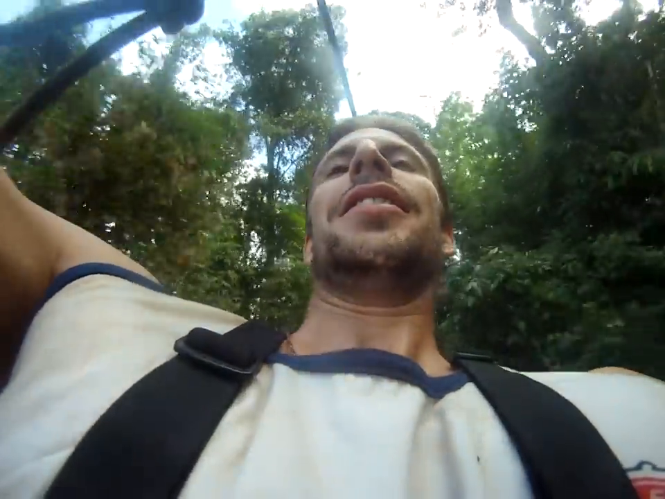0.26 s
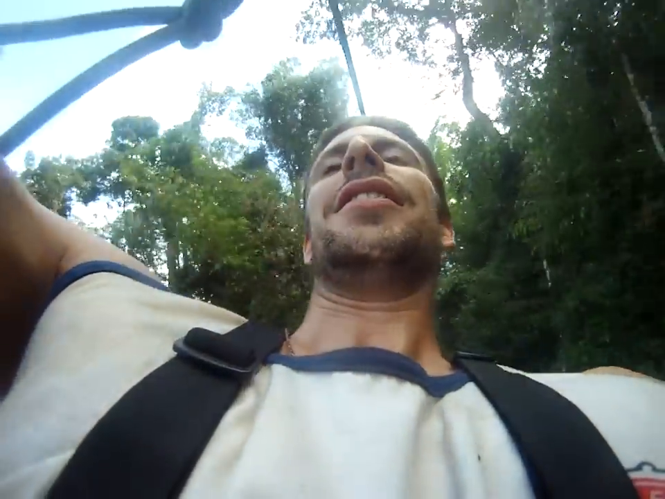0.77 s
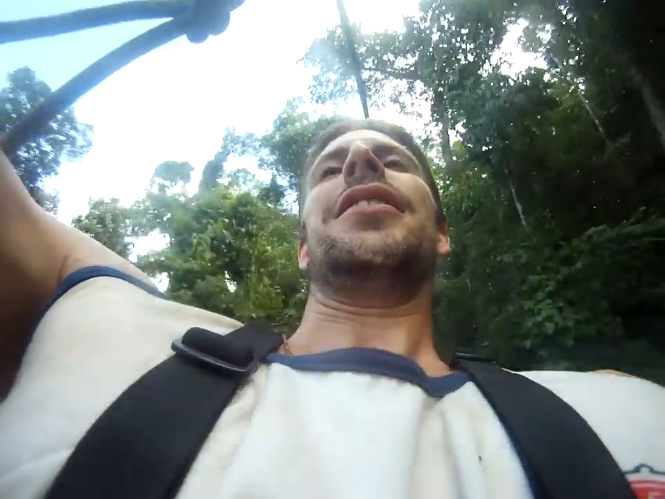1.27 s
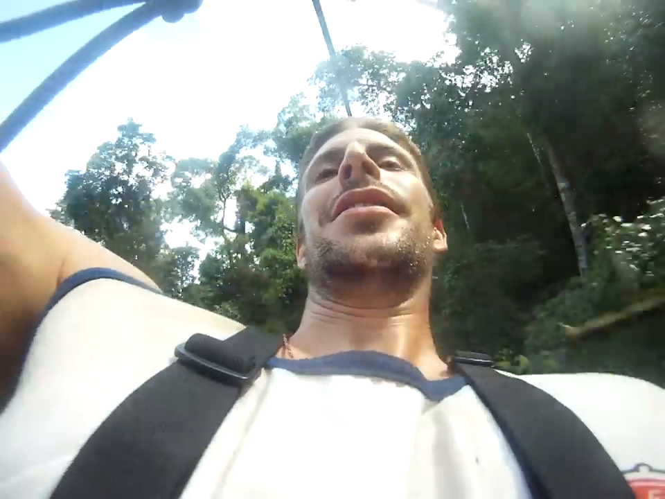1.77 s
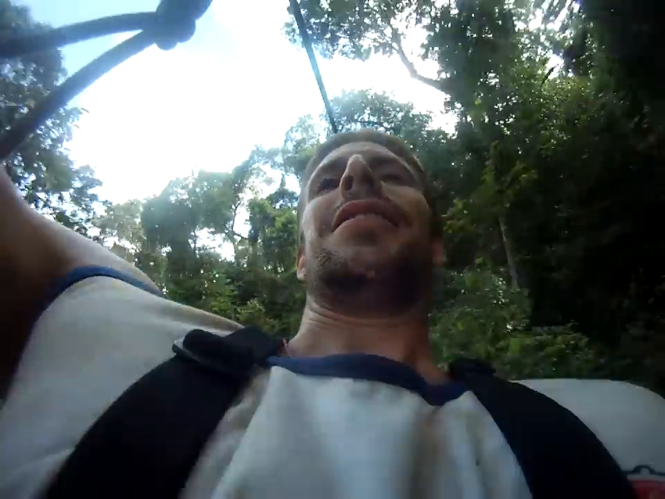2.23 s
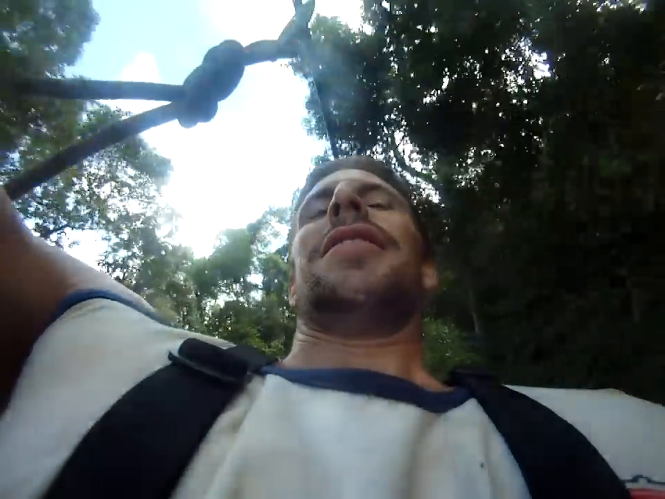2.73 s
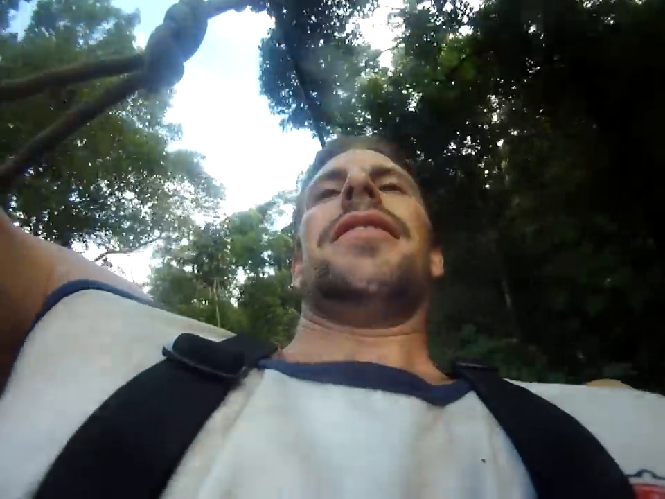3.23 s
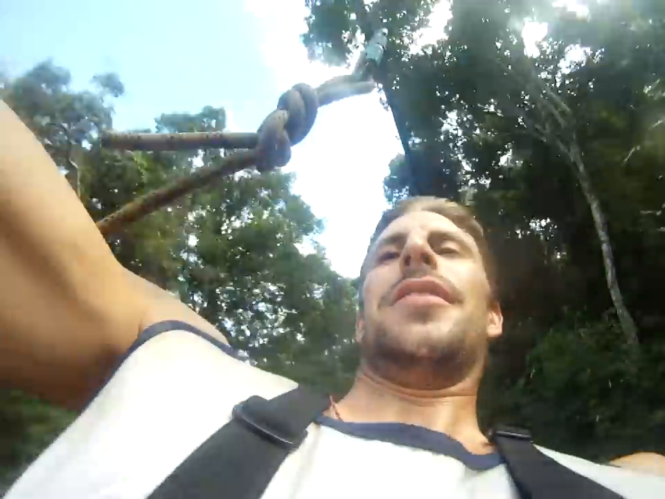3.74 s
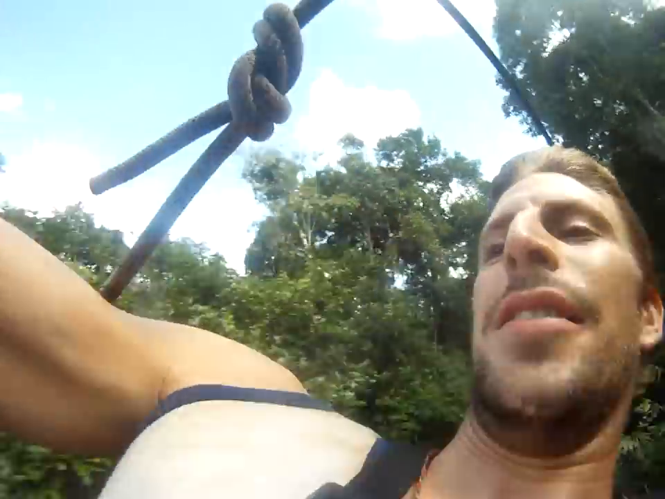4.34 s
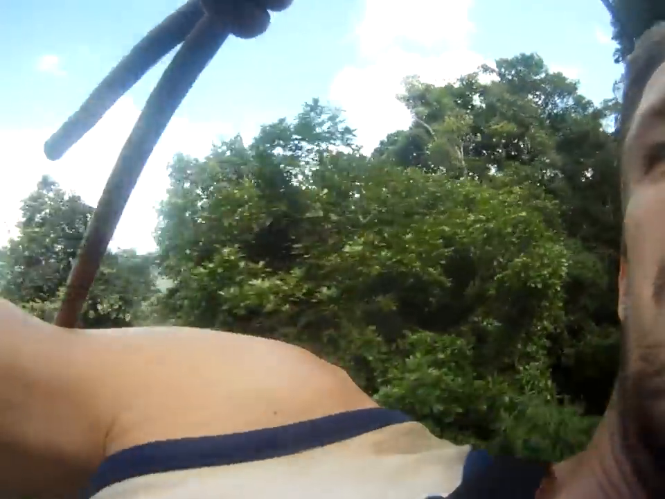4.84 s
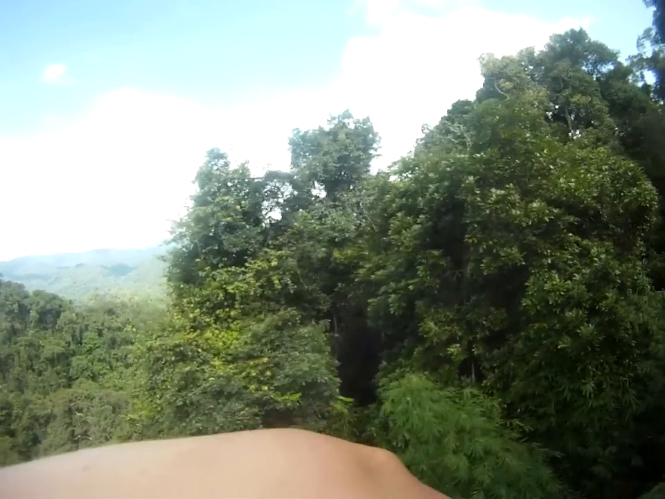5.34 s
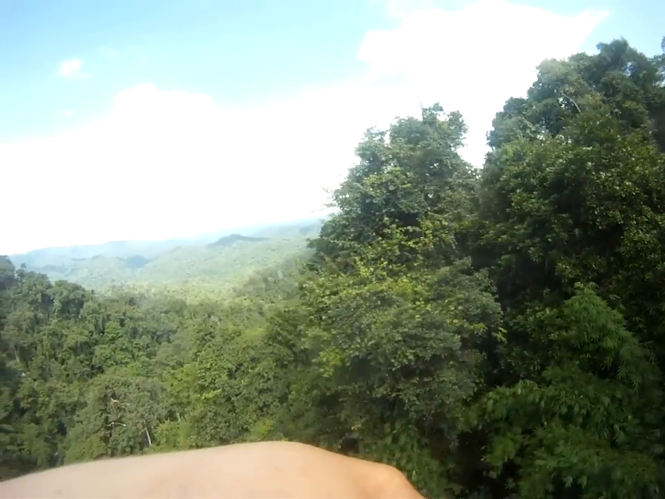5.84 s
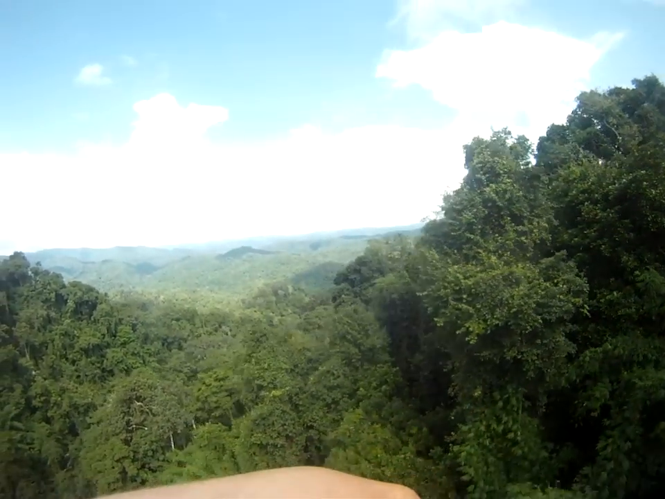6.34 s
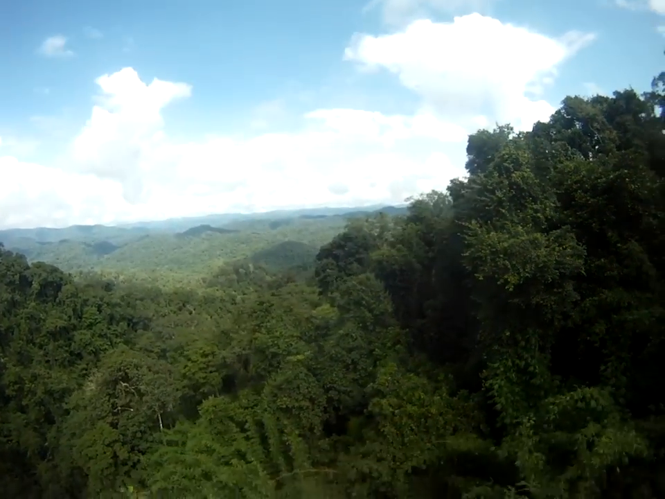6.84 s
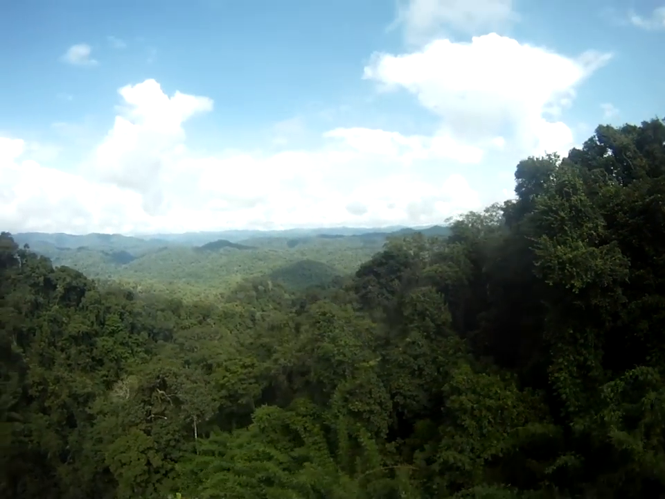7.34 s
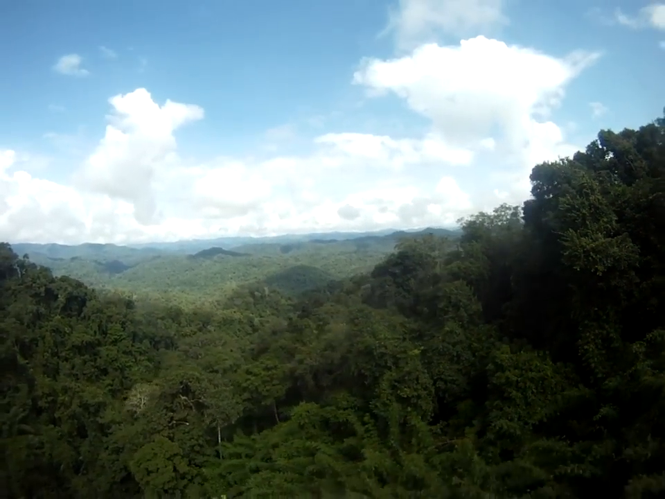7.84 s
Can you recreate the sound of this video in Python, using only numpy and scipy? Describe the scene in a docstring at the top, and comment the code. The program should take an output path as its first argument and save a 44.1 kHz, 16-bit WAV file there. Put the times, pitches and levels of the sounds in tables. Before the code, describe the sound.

A pulley trolley runs along a steel cable in open forest, heard from a small handheld camera. Its rough metallic roar and wavering whine climb in pitch, with thin squeals flaring in the first five seconds. Four hard, distorted knocks hit the camera shell mid-ride, briefly ducking everything. Then the pitch levels off and wind buffets and pops against the microphone while the rolling continues.

```python
"""Zipline ride

A zipline trolley gathers speed down a steel cable, heard from a small camera held by the rider.
Tones tied to one speed curve make whine, whirr and squeals; coloured noise makes rolling and wind.
Filtered bursts slap the microphone; four knocks of damped sines overload it and the gain ducks.
Coarse 12 kHz sampling with held samples mirrors the sound into the treble."""
import sys
import numpy as np
from scipy import signal
from scipy.fft import rfft, irfft, next_fast_len
from scipy.io import wavfile
from scipy.ndimage import uniform_filter1d

SR = 44100
rng = np.random.default_rng(int(sys.argv[2]) if len(sys.argv) > 2 else 0)


def dump_mix(stems):
    """Bounce the given channels to the path in sys.argv[1] as a 16-bit WAV at rate SR."""
    frames = np.atleast_2d(stems).T  # one column per channel
    limited = np.clip(frames, -1, 1)  # hard clip at full scale
    pcm = np.round(limited * 32767).astype(np.int16)
    wavfile.write(sys.argv[1], SR, pcm)


N = 357210
T = np.arange(N) / SR

# camera swing: time_s, facing (0 front, 1 side, 2 away)
CAMERA_SWING = [(0, 0), (2, 0.067), (3.2, 0.13), (3.9, 1.2), (5.1, 1.16), (5.7, 1.84), (6.4, 1.92),
                (8.1, 1.87)]
START_HZ, TOP_HZ, TOP_SPEED_S = 1386, 1813, 6.0  # strands crossed per second; time of top speed
STRANDS_PER_TURN = 11.86
WOBBLE_TOP_HZ = 22  # partials' pitch spread at top speed


def from_db(db):
    """Decibels to amplitude gain."""
    return 10 ** (np.asarray(db) / 20)


def rms_one(x):
    """Scale to rms 1."""
    return x / np.sqrt(np.mean(x ** 2) + 1e-20)


def in_time(rows):
    """Interpolate each column of a time curve at every sample."""
    time_s, *columns = np.transpose(rows)
    return [np.interp(T, time_s, column) for column in columns]


def drift(corner_hz):
    """Slow random curve, rms 1: two-pole smoothed noise made at SR / 20."""
    r = np.exp(-40 * np.pi * corner_hz / SR)
    noise = rng.standard_normal(N // 20 + 4002)
    slow = signal.lfilter([1], [1, -2 * r, r * r], noise)[4000:]  # drop the settling
    return np.interp(np.arange(N) / 20, np.arange(len(slow)), rms_one(slow))


def band(x, hz, kind, order=4):
    """Butterworth filter."""
    return signal.sosfilt(signal.butter(order, hz, kind, fs=SR, output="sos"), x)


def coloured(spectrum):
    """Noise shaped to a spectrum on a log-frequency axis, rms 1."""
    hz, density_db = np.transpose(spectrum)
    size = next_fast_len(N)
    bins_hz = np.maximum(np.fft.rfftfreq(size, 1 / SR), 1)
    gain = from_db(np.interp(np.log(bins_hz), np.log(hz), density_db))
    return rms_one(irfft(rfft(rng.standard_normal(size)) * gain, size)[:N])


def resonate(x, modes):
    """Parallel two-pole resonances of alternating sign."""
    out = 0
    for k, (hz, width_hz, gain_db) in enumerate(modes):
        r = np.exp(-np.pi * width_hz / SR)
        zeros = np.array([1, 0, -1]) * (1 - r * r) / 2
        poles = [1, -2 * r * np.cos(2 * np.pi * hz / SR), r * r]
        out = out + (-1) ** k * from_db(gain_db) * signal.lfilter(zeros, poles, x + 1e-18)
    return out


def burst(start_s, hold_s, fade_s):
    """Envelope: instant onset, hold, exponential decay."""
    return (T >= start_s) * np.exp(-np.clip((T - start_s - hold_s) / fade_s, 0, 20))


def sine(hz):
    """Sine following a pitch curve from a random phase."""
    return np.sin(2 * np.pi * (np.cumsum(hz) / SR + rng.random()))


def partial(hz, wobble_hz, flutter_db):
    """Tone with random pitch wobble and level flutter, rms 1."""
    return rms_one(from_db(flutter_db * drift(28)) * sine(hz + wobble_hz * drift(70)))


def speed():
    """Strands per second: the pull fades evenly to zero at top speed, with one brief check."""
    # check on the way: slowest_s, lost_hz, half_length_s
    sag = (4.45, 13, .4)
    slowest_s, lost_hz, half_s = sag
    remaining = np.maximum(1 - T / TOP_SPEED_S, 0)
    check_hz = lost_hz * np.exp(-((T - slowest_s) / half_s) ** 2)
    return TOP_HZ - (TOP_HZ - START_HZ) * remaining ** 2 - check_hz


def by_facing():
    """Frame ring pitch and top-speed rolling level, interpolated by the camera swing."""
    # pickup facing front, side, away: frame_ring_hz, rolling_db (at top speed, before trim)
    pickup = [(3060, -26), (2936, -29), (2794, -28.5)]
    swing, = in_time(CAMERA_SWING)
    return [np.interp(swing, np.arange(len(pickup)), column) for column in np.transpose(pickup)]


def roll_level():
    """Rolling level in dB before trims: rises 12.5 dB per doubling of speed."""
    _, top_speed_db = by_facing()
    return top_speed_db + 12.5 * np.log2(speed() / TOP_HZ)


def trolley(whine_trim_db=3, whirr_trim_db=-1, judder_db=0.68):
    """Whine, whirr, squeals, rolling and hum, shaken together by the cable."""
    # strand whine: time_s, level_db (before trim)
    whine_curve = [(0, -35), (.2, -28), (.9, -25.5), (1.1, -35), (1.38, -34), (1.6, -23.5), (2.25, -37.5),
                   (2.65, -34.5), (3.45, -28), (4, -46), (4.9, -39), (5.42, -29.5), (5.62, -22.5),
                   (5.8, -31.5), (7.25, -33), (7.72, -27), (7.85, -39), (8.1, -34.5)]
    # frame whirr: time_s, level_db (before trim)
    whirr_curve = [(0, -18.5), (.5, -21.5), (.68, -15), (.95, -25), (1.48, -22), (1.62, -17.5), (1.85, -25),
                   (2.17, -17), (2.7, -25), (3.3, -22.5), (3.9, -31), (5, -21.5), (5.3, -29), (5.9, -60),
                   (6.4, -23), (7.15, -21), (7.6, -19), (8.1, -23.5)]
    whine_db, = in_time(whine_curve)
    whirr_db, = in_time(whirr_curve)
    strand_hz = speed() + 3 * drift(3)
    turn_hz = strand_hz / STRANDS_PER_TURN
    ring_hz, _ = by_facing()
    wobble_hz = WOBBLE_TOP_HZ * (strand_hz / TOP_HZ) ** 3
    ring = wheel_ring(turn_hz, ring_hz, width_hz=280, wobble_hz=wobble_hz, flutter_db=4)
    whirr = from_db(whirr_db + whirr_trim_db) * ring
    tones = whine(strand_hz, whine_db + whine_trim_db) + whirr + squeals(turn_hz)
    return (tones + rolling() + frame_hum()) * from_db(judder_db * drift(9.1))


def whine(strand_hz, level_db, wobble_hz=5, flutter_db=1.1):
    """Twisted strands tap the wheel: one sine at the strand rate."""
    return from_db(level_db + flutter_db * drift(17)) * sine(strand_hz + wobble_hz * drift(33))


def wheel_ring(turn_hz, centre_hz, width_hz, wobble_hz, flutter_db):
    """Multiples of the turning rate swell as they glide through the frame's ring; rms 1."""
    out, power = 0, 0
    for multiple in range(17, 28):
        hz = multiple * turn_hz
        weight = 1 / (1 + (2 * (hz - centre_hz) / width_hz) ** 2)
        out = out + weight * partial(hz, wobble_hz, flutter_db)
        power = power + weight ** 2
    return rms_one(out / np.sqrt(power))


def squeals(turn_hz, patchy_db=2.5, attack_s=0.02, release_s=0.046):
    """Wheel partials sing faintly and unevenly, and flare into purer tones when the wheel squeals."""
    # constant partials: multiple of turning rate, level_db
    partials = [(22, -39), (24, -35), (25, -34), (26, -42), (27, -31.5), (28, -38)]
    # squeals: start_s, hold_s, multiple of turning rate, peak_db
    squeal_events = [(0, 0.045, 26, -19), (0.193, 0.27, 26, -25), (0.336, 0.093, 25, -19),
                     (0.577, .18, 25, -20.5), (0.916, 0.19, 27, -26), (1.55, 0.17, 24, -21),
                     (1.943, 0.27, 22, -20), (1.975, 0.36, 26, -36), (1.965, 0.82, 25, -24),
                     (2.37, 0.43, 27, -22.5), (2.398, 0.1, 28, -24), (2.403, 0.14, 26, -22),
                     (2.916, 1.1, 28, -27), (2.923, 1.15, 26, -23.5), (3.2, 0.13, 25, -21.5),
                     (3.257, 0.76, 27, -20), (3.72, 0.25, 25, -17), (4.008, 0.24, 25, -16),
                     (4.297, 0.35, 25, -18.5), (4.842, 0.24, 25, -22.5), (4.904, 0.4, 24, -25),
                     (6.714, 0.1, 24, -24)]
    out = 0
    for multiple, faint_db in partials:
        hz, flare = multiple * turn_hz, np.zeros(N)
        for start_s, hold_s, squeal_multiple, peak_db in squeal_events:
            if squeal_multiple == multiple:
                attack = np.clip((T - start_s) / attack_s, 0, 1)
                shape = attack * burst(start_s, hold_s, release_s)
                flare = np.maximum(flare, from_db(peak_db) * shape)
        faint = partial(hz, wobble_hz=WOBBLE_TOP_HZ, flutter_db=4)
        pure = partial(hz, wobble_hz=12, flutter_db=3.2)
        out = out + from_db(faint_db + patchy_db * drift(6.7)) * faint + flare * pure
    return out


def rolling(roll_trim_db=1.5, ring_dip_db=-5, rough_db=1.0):
    """Steel on steel: rough roar with a rasp on top, coloured by the way the camera faces."""
    # rolling colours by facing: pitch_hz, density_db (per Hz, relative)
    roll_front = [(700, -74), (1100, -25), (1300, -25), (1480, -13.5), (1720, -19), (1880, -11.5),
                  (2020, -23.5), (2280, -5.5), (2700, -19), (3100, 2), (3500, -11.5), (3720, -17.5),
                  (3920, -8), (4300, -18), (5650, -1.5)]
    roll_side = [(700, -26), (1100, -21), (1300, -22), (1480, -12), (1680, -17), (1950, -11), (2200, -6),
                 (2480, -10), (2800, -2), (3250, -16.5), (3550, -2), (3950, -1.5), (4600, -17.5),
                 (5200, -1.5), (5650, -7.5)]
    roll_away = [(700, -28), (1100, -23.5), (1350, -19.5), (1600, -23.5), (1900, -9.5), (2150, -15),
                 (2500, -9), (2820, 1), (3100, -2), (3550, -12.5), (3900, -36), (4250, -8), (4950, -15),
                 (5400, -9.5), (5650, -11)]
    # wheel rasp: time_s, level_db
    rasp_curve = [(0, -26.5), (1.05, -25), (2, -29.5), (2.25, -20.5), (2.5, -25), (2.9, -22.5),
                  (3.5, -25.5), (3.85, -20), (4.45, -17.5), (5.2, -19.5), (5.42, -29), (6.1, -28),
                  (6.8, -21), (6.95, -26), (7.35, -27), (7.62, -20.5), (7.88, -25), (8.1, -24)]
    roll_db = roll_level() + roll_trim_db
    rasp_db, = in_time(rasp_curve)
    swing, = in_time(CAMERA_SWING)
    out = 0
    for k, spectrum in enumerate([roll_front, roll_side, roll_away]):
        noise = band(coloured(spectrum), 840, "high")
        reference = np.std(band(noise, [1950, 2700], "band"))
        body = band(noise, 4336, "low", order=8) / reference
        rasp = rms_one(band(coloured(spectrum), [4400, 5900], "band", order=5))
        # around 3 kHz the energy goes into the wheel's partials instead
        body = body - (1 - from_db(ring_dip_db)) * resonate(body, [(3093, 470, 0)])
        facing = np.sqrt(np.clip(1 - abs(swing - k), 0, 1))
        out = out + facing * (from_db(roll_db) * body + from_db(rasp_db) * rasp)
    return out * from_db(rough_db * drift(140))


def frame_hum(hz=690, width_hz=70, below_roll_db=-24):
    """Rolling stirs one low trolley ring (twice-resonated noise), heard while the camera faces it."""
    swing, = in_time(CAMERA_SWING)
    facing = np.clip(1 - swing, 0, 1)
    narrow = resonate(rng.standard_normal(N), [(hz, width_hz, 0)])
    hum = rms_one(resonate(narrow, [(hz, 2 * width_hz, 0)]))
    return facing * from_db(roll_level() + below_roll_db) * hum


def knocks(low_hz=1000, upper_hz=2430, high_hz=3690, upper_db=-3, grit_db=-7, thud_db=-14):
    """Something hard chatters on the camera shell: four damped rings, grit and a thud."""
    # knocks: start_s, strength_db, contact_s, shell_ring_hz, low_ring_db, high_ring_db (rings re strength)
    knock_events = [(4.4325, 12, 0.0048, 2125, -18, 2.5), (4.6266, 12, 0.0021, 2190, -19.5, -3),
                    (5.0181, 7, 0.0017, 2096, -7, -25), (5.4197, 7.5, 0.0033, 1710, -3.5, 1)]
    out = 0
    grit_noise = band(rng.standard_normal(N), [700, 3500], "band", order=2)
    grit = from_db(grit_db) * rms_one(grit_noise)
    # uneven contacts keep restarting the rings, which smears their pitch
    chatter_rad = 0.91 * drift(364)
    for start_s, strength_db, contact_s, ring_hz, low_db, high_db in knock_events:
        modes = [(ring_hz, 0), (upper_hz, upper_db), (low_hz, low_db), (high_hz, high_db), (170, thud_db)]
        ring = sum(from_db(db) * np.sin(2 * np.pi * hz * (T - start_s) + chatter_rad) for hz, db in modes)
        out = out + from_db(strength_db) * (ring + grit) * burst(start_s, contact_s, fade_s=0.0016)
    return out


def wind():
    """Rumble and rush follow the gusty airflow; eddies slap the microphone."""
    # airflow: time_s, rumble_db (before trim)
    airflow = [(0, -34), (1.1, -29.5), (2.4, -32.5), (3.3, -21.5), (4.2, -27), (5.15, -25.5), (5.8, -22),
               (6.65, -19.5), (7.45, -19.5), (8.1, -26)]
    # gusts: peak_s, rise_db, half_length_s
    gusts = [(3.26, 3.5, 0.032), (3.77, 7.5, 0.027), (3.968, 8, 0.027), (4.43, 5.5, 0.062),
             (5.971, 11, 0.039), (6.23, 3, 0.03), (7.09, 7.5, 0.043), (8.002, 6.5, 0.053)]
    flow_db, = in_time(airflow)
    rise_db = sum(db * np.exp(-((T - peak_s) / half_s) ** 2) for peak_s, db, half_s in gusts)
    level_db = flow_db + rise_db
    swing_db = level_db - flow_db.mean()
    return rumble(level_db, swing_db) + rush(swing_db) + slaps()


def rumble(level_db, swing_db, trim_db=-2.0, lumpy_db=2.0, eddy_hz=130, eddy_follows=0.16):
    """Lumpy low noise; faster air makes smaller eddies, so the part above eddy_hz swings further."""
    # rumble colour: pitch_hz, density_db (per Hz, relative)
    rumble_colour = [(12, -42), (20, 5.5), (65, 2), (125, -1.5), (226, -11), (328, -21.5), (375, -27),
                     (552, -28), (700, -30.5), (910, -61), (1540, -120)]
    air = band(coloured(rumble_colour), 30, "high", order=3)
    air = rms_one(air * from_db(lumpy_db * drift(23)))
    deep = band(air, eddy_hz, "low", order=1)
    return from_db(level_db + trim_db) * (deep + from_db(eddy_follows * swing_db) * (air - deep))


def rush(swing_db, mean_flow_db=-46.5, follows=0.72):
    """Rush of air: coloured noise following a share of the rumble's swing."""
    # rush colour: pitch_hz, density_db (per Hz, relative)
    rush_colour = [(200, -9), (400, -1.5), (550, -16), (690, -4.5), (820, 0), (1000, 4.5), (1200, -9),
                   (1700, -22), (3000, -47)]
    return from_db(mean_flow_db + follows * swing_db + 1.0 * drift(40)) * coloured(rush_colour)


def slaps():
    """Eddies slap the microphone port: short low-passed bursts of resonant noise."""
    # slaps: start_s, level_db, hold_s, brightness_hz (low-pass)
    slap_events = [(3.188, -20, .0054, 1400), (3.292, -32, .026, 900), (3.339, -22.5, 0.025, 1000),
                   (3.424, -23, 0.012, 1000), (3.67, -26, 0.0056, 1100), (3.76, -24, .004, 1300),
                   (3.961, -29, .008, 900), (5.907, -4.5, 0.0024, 1800), (5.92, -9.5, .0013, 2200),
                   (5.927, -18, 0.0037, 2000), (5.954, -13, 0.0052, 1500), (5.968, -23, 0.0088, 2000),
                   (5.995, -14, .0017, 1500), (6.013, -21, 0.0044, 1400), (6.05, -11, 0.0055, 2200),
                   (6.916, -8, 0.0039, 800), (7.048, -19, 0.014, 2800), (7.068, -16, 0.018, 3000),
                   (7.084, -1, .003, 350), (7.158, -24, 0.012, 2500), (7.886, -16.5, 0.0046, 1700)]
    # microphone port resonances: pitch_hz, width_hz, gain_db
    port_modes = [(130, 190, -1), (540, 330, -4.5), (900, 220, 5.5), (2060, 280, 5.5)]
    port = rms_one(resonate(rng.standard_normal(N), port_modes))
    out = 0
    for start_s, level_db, hold_s, bright_hz in slap_events:
        slap = port * burst(start_s, hold_s, fade_s=0.0016)
        out = out + from_db(level_db) * band(slap, bright_hz, "low", order=2)
    return out


def scene():
    """Trolley overhead, knocks and wind at the camera."""
    return (trolley() + knocks() + wind())[None]


def gain_control(x, threshold_db=-5, release_db_per_s=85, attack_s=0.0039):
    """Loud peaks pull the gain down within milliseconds; it creeps back."""
    level_db = 10 * np.log10(np.maximum(uniform_filter1d(x ** 2, size=130), 1e-12))
    over_db = np.maximum(level_db - threshold_db, 0)
    release_db = release_db_per_s * T
    held_db = np.maximum.accumulate(over_db + release_db) - release_db
    r = np.exp(-1 / (attack_s * SR))
    return x * from_db(-signal.lfilter([1 - r], [1, -r], held_db))


def record(dry):
    """Gain control, 12 kHz sampling with clipping; held samples mirror the sound above 6 kHz."""
    anti_alias = signal.ellip(6, .3, 50, 5720, fs=SR, output="sos")
    x = signal.sosfilt(anti_alias, gain_control(dry[0]))
    coarse = np.clip(signal.resample_poly(x, 40, 147, window=("kaiser", 2)), -1, 1)
    held = signal.resample_poly(np.repeat(coarse, 4), 147, 160)[:N]  # 48 kHz back to SR
    output_filter = signal.ellip(10, .2, 70, 15500, fs=SR, output="sos")
    return signal.sosfilt(output_filter, held)[None]


dry = scene()
out = record(dry)
dump_mix(out)
```